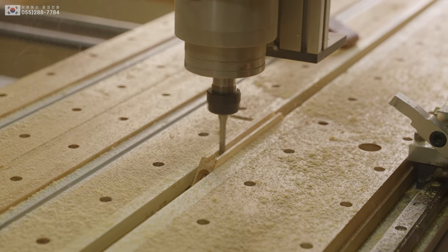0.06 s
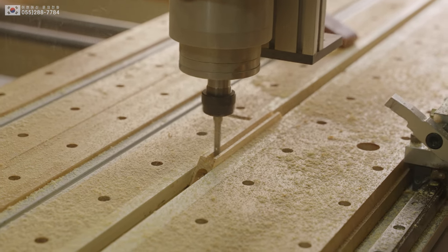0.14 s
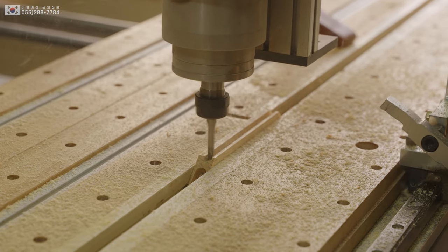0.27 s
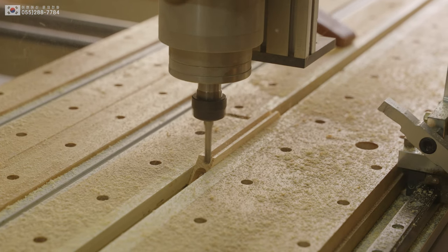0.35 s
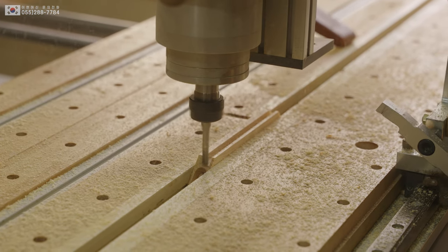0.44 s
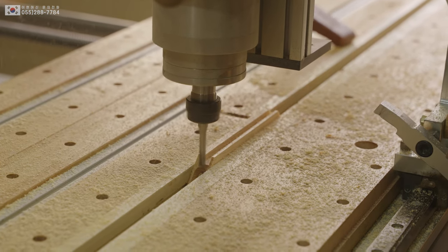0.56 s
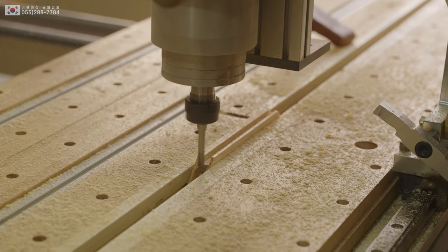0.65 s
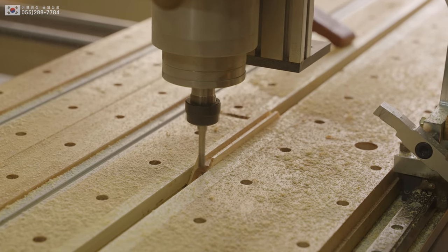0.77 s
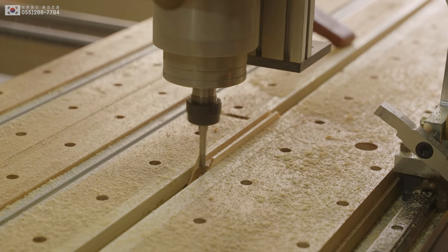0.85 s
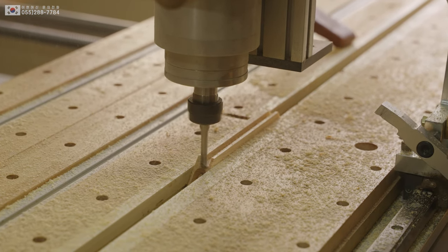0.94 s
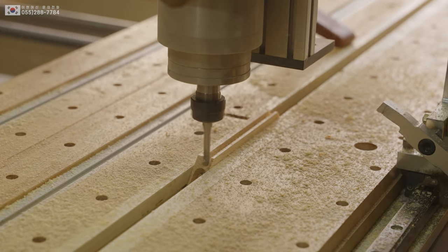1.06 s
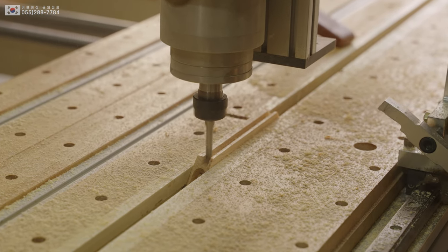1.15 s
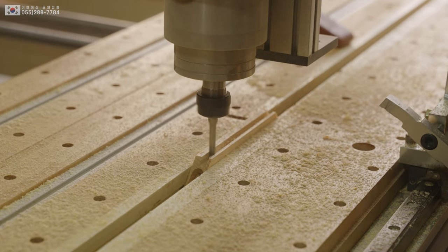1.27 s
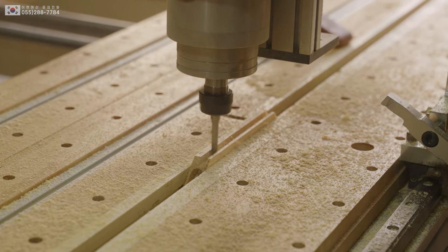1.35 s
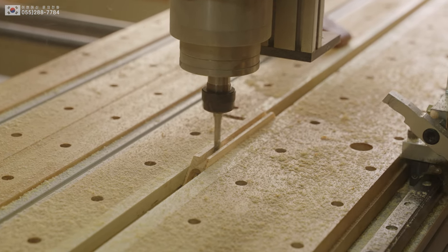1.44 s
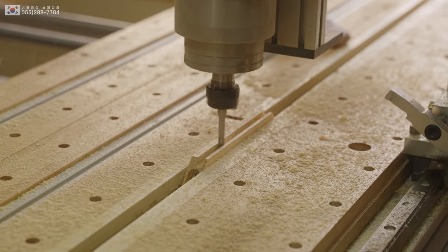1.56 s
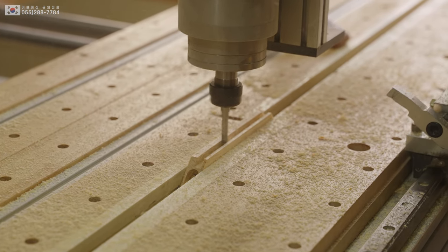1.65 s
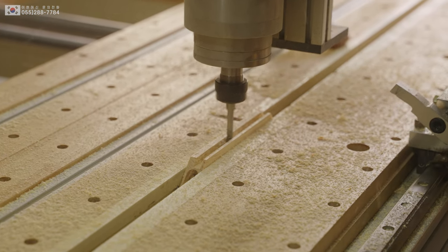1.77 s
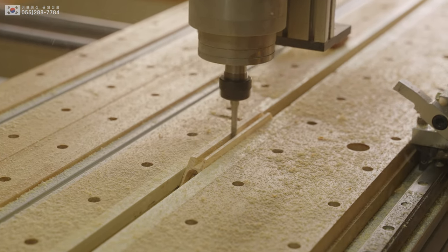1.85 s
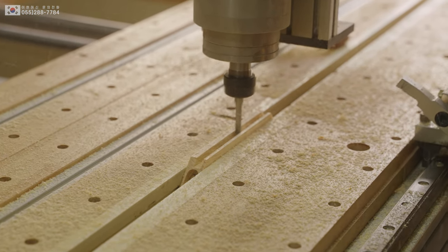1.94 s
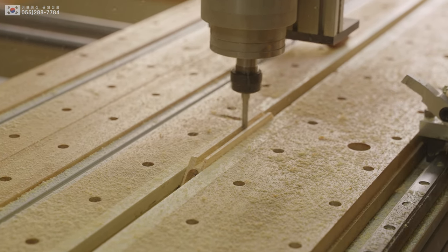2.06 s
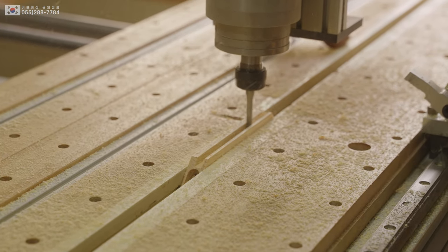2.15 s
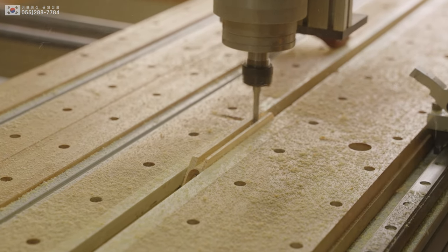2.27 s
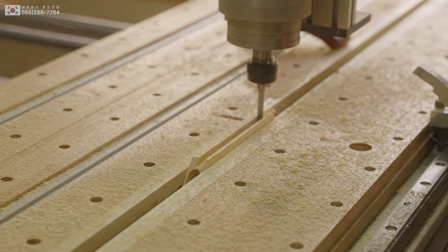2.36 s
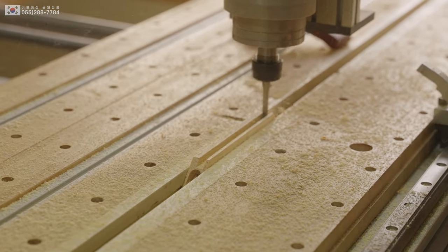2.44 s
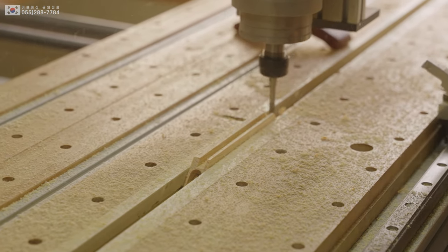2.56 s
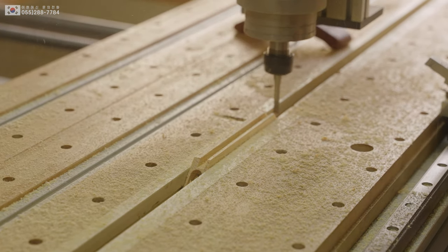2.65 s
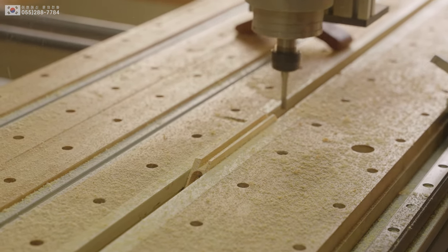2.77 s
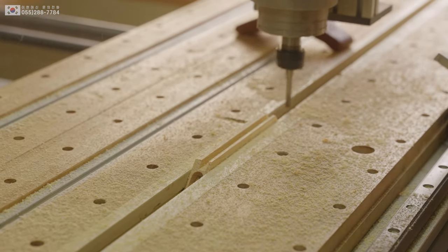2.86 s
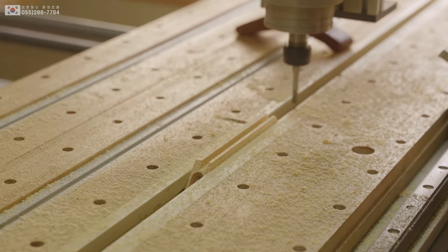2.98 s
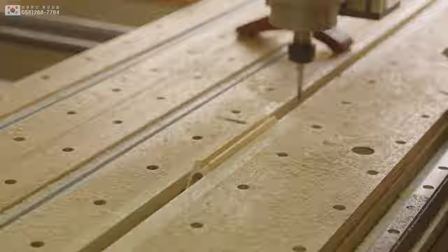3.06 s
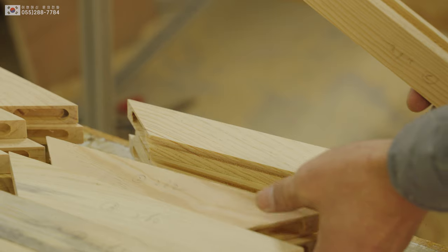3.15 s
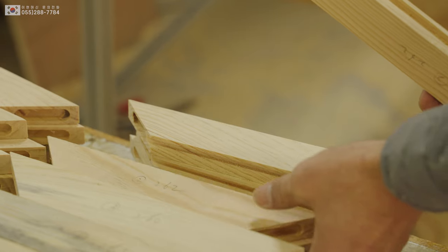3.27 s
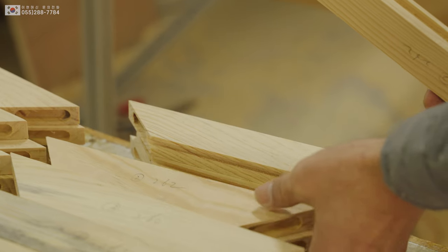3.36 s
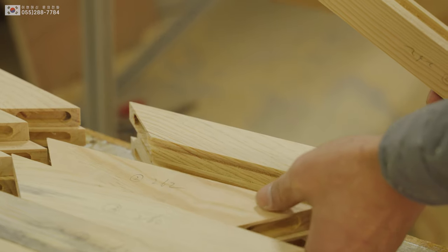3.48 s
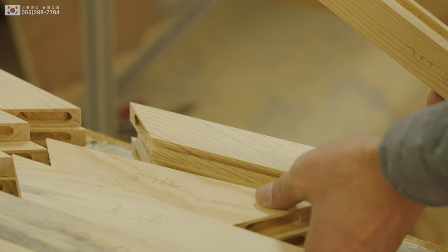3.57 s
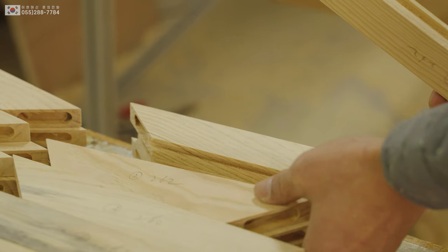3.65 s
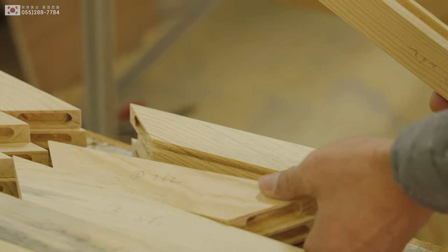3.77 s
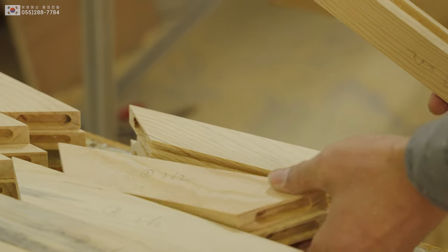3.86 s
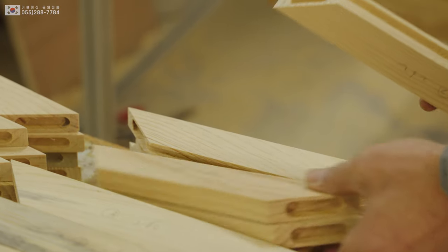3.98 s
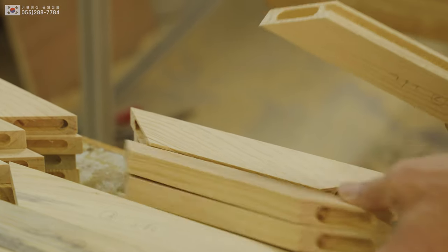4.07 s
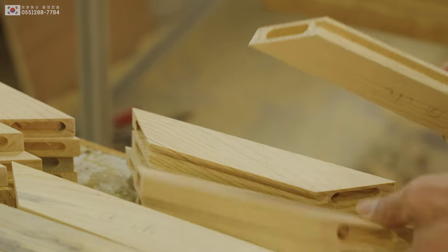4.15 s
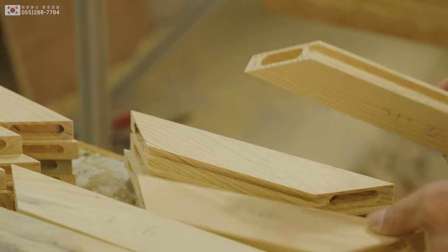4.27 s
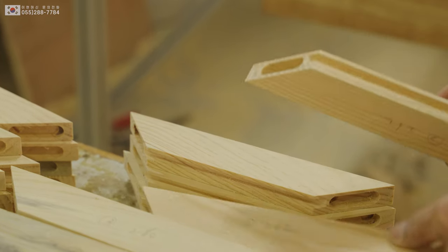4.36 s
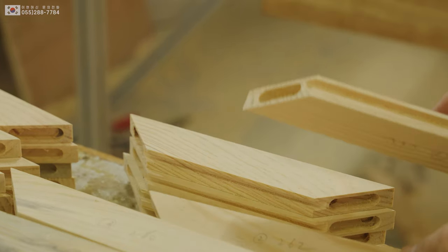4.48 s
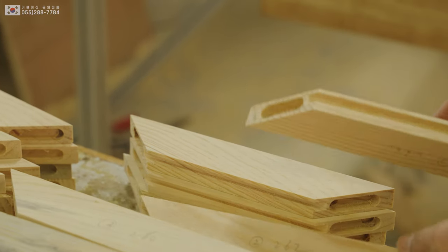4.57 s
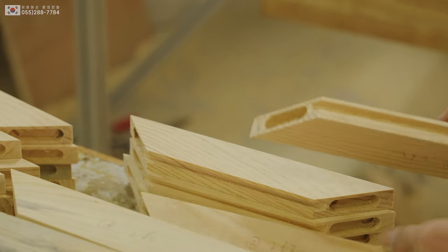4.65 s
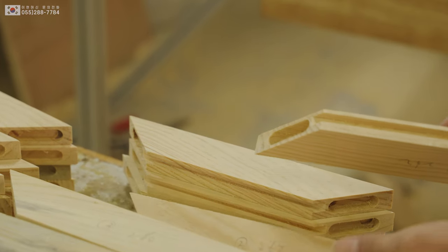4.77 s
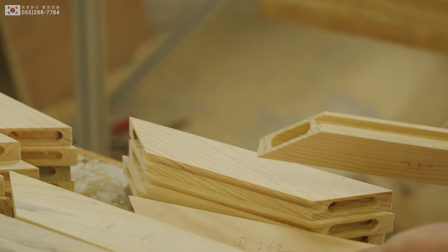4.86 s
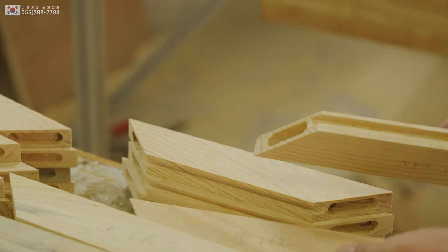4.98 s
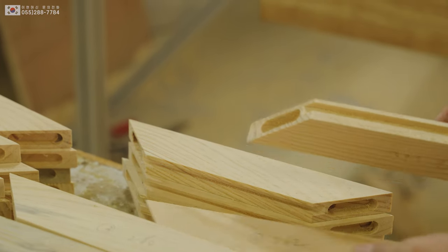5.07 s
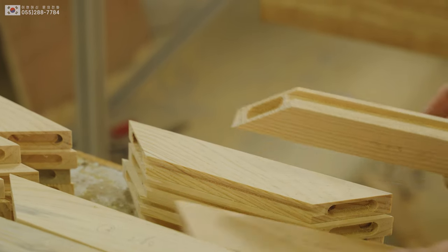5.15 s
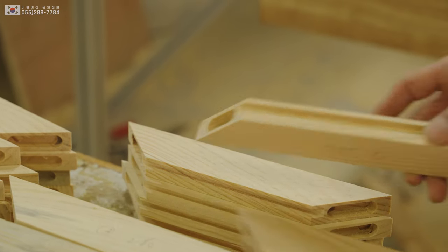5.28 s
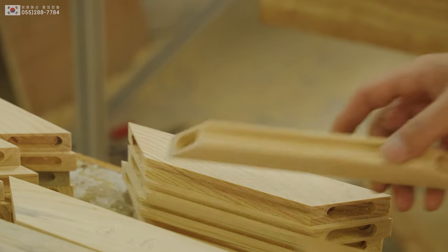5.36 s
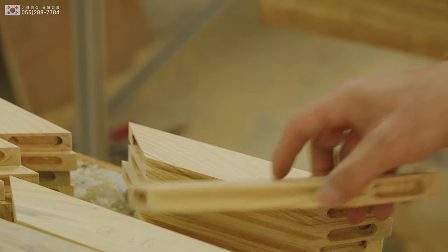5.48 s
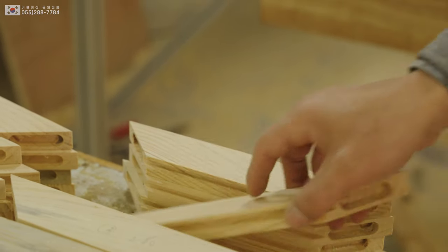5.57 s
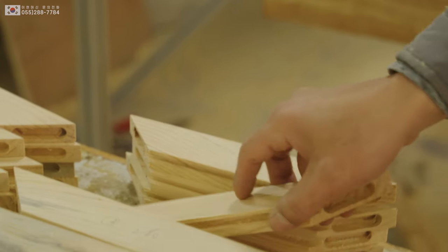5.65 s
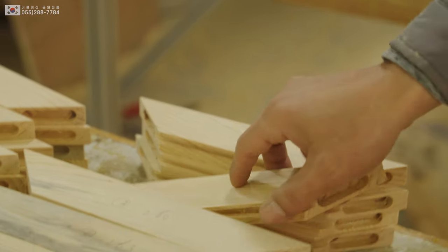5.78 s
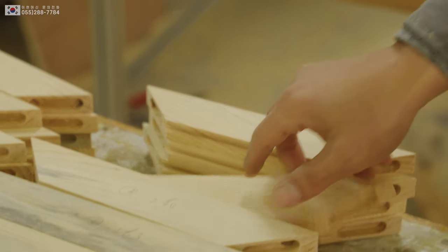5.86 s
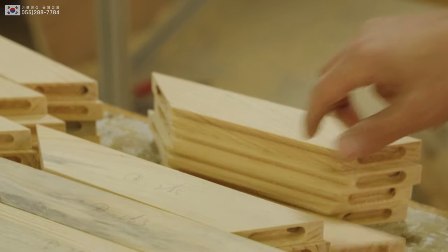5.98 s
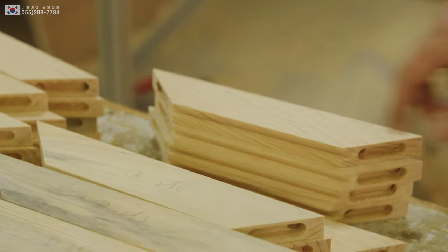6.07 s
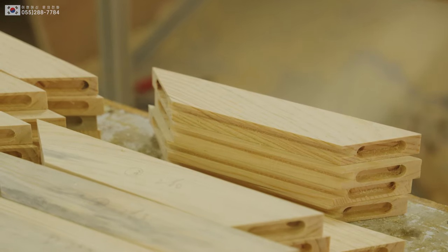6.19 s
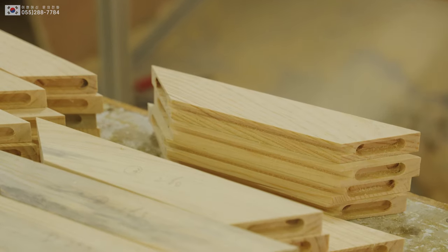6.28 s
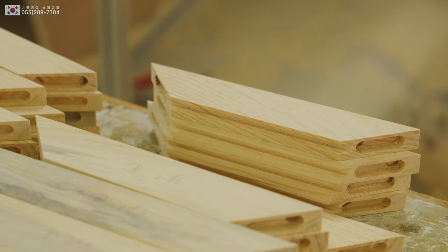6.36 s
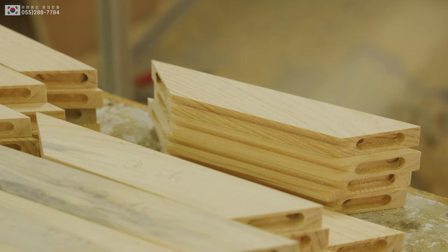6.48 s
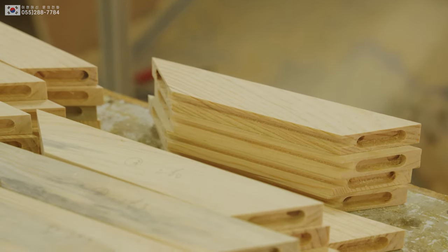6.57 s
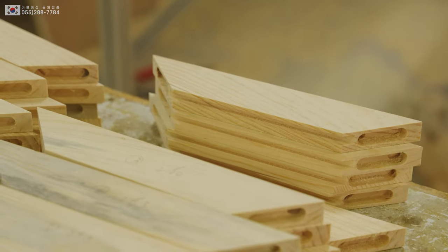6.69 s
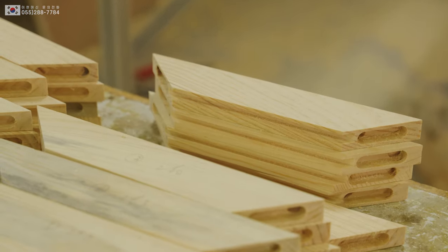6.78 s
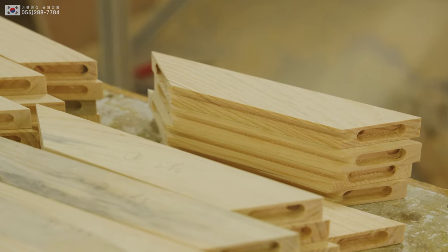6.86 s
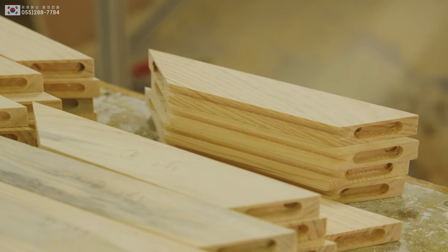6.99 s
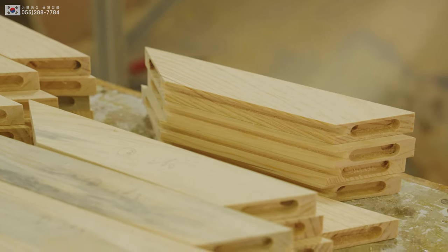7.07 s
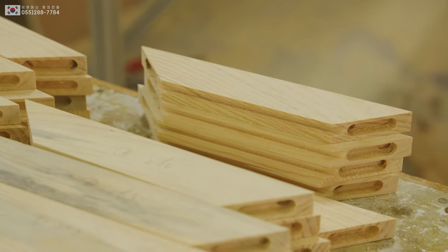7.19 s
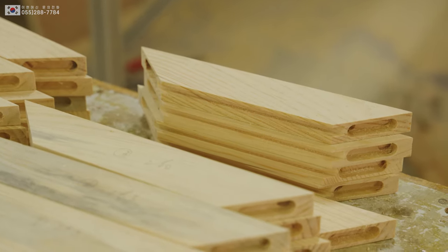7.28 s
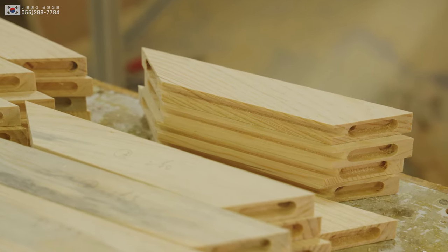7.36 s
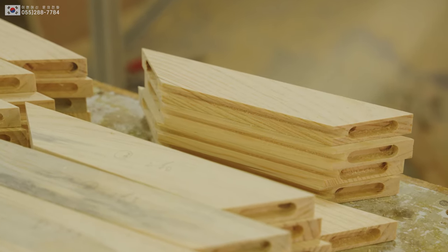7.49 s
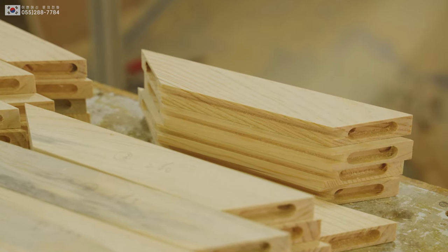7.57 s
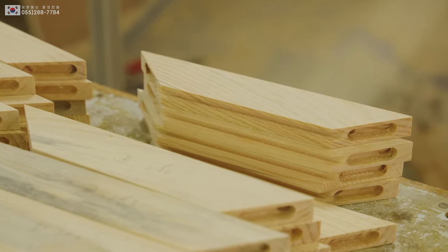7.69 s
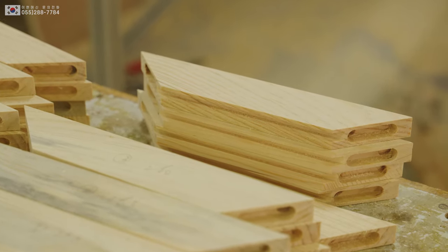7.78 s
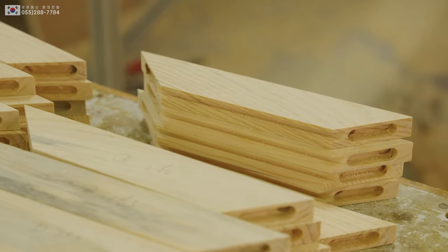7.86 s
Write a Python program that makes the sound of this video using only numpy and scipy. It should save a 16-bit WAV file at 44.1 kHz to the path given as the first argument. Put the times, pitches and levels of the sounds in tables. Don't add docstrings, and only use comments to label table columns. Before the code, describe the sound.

Shrill, hissing wood routing in a noisy workshop cuts abruptly to droning machines, with a sharp clattering slap of stacked boards.

```python
import sys
import numpy as np
from scipy import signal
from scipy.fft import rfft, irfft, next_fast_len
from scipy.io import wavfile
from scipy.ndimage import uniform_filter1d, map_coordinates

SR = 44100
rng = np.random.default_rng(int(sys.argv[2]) if len(sys.argv) > 2 else 0)


def dump_mix(stems):
    frames = np.atleast_2d(stems).T
    limited = np.clip(frames, -1, 1)
    pcm = np.round(limited * 32767).astype(np.int16)
    wavfile.write(sys.argv[1], SR, pcm)


def decibels_to_gain(level_db):
    exponent = np.asarray(level_db, float) / 20
    return 10 ** exponent


N = 349713
SPLICE = 3.164


def unit(x):
    return x / np.sqrt(np.mean(np.abs(x) ** 2) + 1e-20)


def along(points, hz):
    f, v = np.transpose(points)
    return np.interp(np.log(hz + 1), np.log(f + 1), v)


def wobble(n, rate):
    knots = rng.standard_normal(int(n * rate / SR) + 4)
    coarse = map_coordinates(knots, [np.arange(0, n + 64, 64) * rate / SR])
    return np.interp(np.arange(n), np.arange(len(coarse)) * 64, coarse)


def turning(hz):
    return 2 * np.pi * np.cumsum(hz) / SR


def swell(t, rows, order=None):
    total_db = 0
    for row in rows:
        if order is None or round(row[1]) == order:
            total_db = total_db + row[-2] * np.exp(-((t - row[0]) / row[-1]) ** 2 / 2)
    return total_db


def flare(t, rows, at, floor_db):
    gain = decibels_to_gain(floor_db)
    for s, which, db, half in rows:
        if abs(which - at) <= at / 500:
            gain = gain + decibels_to_gain(db - 1) * np.exp(-((t - s) / half) ** 2 / 2)
    return 20 * np.log10(gain)


def takes():
    cut = round(SPLICE * SR)
    return [(slice(a, b), np.arange(a, b) / SR) for a, b in ((0, cut), (cut, N))]


def tone(phase, db, fade_db, side_db, rate=7, rough=0, lean_db=0):
    n = len(phase)
    phase = phase + rng.uniform(0, 2 * np.pi)
    if rough:
        phase = phase + rough * wobble(n, 260)
    sine = np.sin(phase)
    mid = decibels_to_gain(db + fade_db * wobble(n, rate)) * sine
    side = decibels_to_gain(db + side_db - 2.5) * (wobble(n, rate) * sine + wobble(n, rate) * np.cos(phase))
    side += np.tanh(lean_db * np.log(10) / 40) * mid
    return np.sqrt(2) * np.array([mid + side, mid - side])


def rush(n, spectrum, take, patchy_db):
    # (frequency [Hz], correlation [0-1])
    likeness = [(60, 0.85), (300, 1), (600, 0.86), (1200, 1), (2500, 0.11), (5000, 0.59), (10000, 0.18),
                (15000, 0.13)]
    lead_s = -.00004, .00009
    # (frequency [Hz], level [dB])
    lean = [(60, 2.5), (250, 0.5), (600, 2), (1500, 3), (5000, 1.5), (14000, 0.6)]
    z = signal.stft(rng.standard_normal((2, n + 512)), nperseg=512)[2]
    field = uniform_filter1d(rng.standard_normal(z.shape[1:]), 7, 0)
    field = uniform_filter1d(field, 12, 1)
    pair = signal.istft(z * decibels_to_gain(patchy_db * unit(field)), nperseg=512)[1]
    m = next_fast_len(n + 8192)
    hz = np.fft.rfftfreq(m, 1 / SR)
    turn = np.arccos(np.clip(along(likeness, hz), 0, 1)) / 2
    a, b = rfft(pair, m) * decibels_to_gain(along(spectrum, hz)) * [np.cos(turn), np.sin(turn)]
    tilt = decibels_to_gain(along(lean, hz) / 2) * np.exp(1j * np.pi * hz * lead_s[take])
    return unit(irfft(np.array([(a + b) * tilt, (a - b) / tilt]), m)[:, :n])


def hall():
    # (frequency [Hz], level [dB per Hz])
    roar_spectra = [
        [(25, -47), (150, -39.5), (300, -29.5), (440, -17.5), (580, -18.5), (720, -7.5), (1000, -6.5), (1900, -2.5), (3000, -2), (4100, -5), (4800, -8.5), (9000, -11), (11400, -10), (15700, -13)],
        [(25, -40), (150, -41.5), (300, -31), (460, -23.5), (600, -21), (750, -11.5), (1100, -8.5), (1900, -6.5), (4000, -7), (4700, -11.5), (8500, -12.5), (11200, -14.5), (12500, -17), (15700, -18)],
    ]
    hums = [(298, -66, -75), (501.8, -46, -48), (596, -68, -66), (642, -57, -60), (712, -54, -56),
            (1042, -70, -57), (1507, -45, -56), (10870, -54, -50.5), (11047, -48, -58), (11152, -42.5, -59)]
    # (time [s], hum [Hz], level [dB], half length [s])
    hum_swells = [(.8, 502, 2, .2), (2.1, 502, -2.5, .8), (4.2, 502, 2, 1.1), (7.5, 502, -3, .8),
                  (.4, 596, 11, .5), (.7, 642, 4, .25), (5.4, 502, 2.5, .5), (7.5, 298, 8, .6),
                  (4.6, 1042, 10, .45), (.15, 1507, 4, .08), (.35, 1507, 8, .04), (1.18, 1507, 9, .05),
                  (1.85, 1507, 3, .1), (2.38, 1507, 10, .05), (.9, 11152, 3, .35), (2.85, 502, -3, .25),
                  (.8, 298, 3, .2)]
    roar_db, roar_falls_db_per_s = (-41.5, -40.5), 0.33
    drive_falls_db_per_s = 4
    parts = []
    for take, (span, _) in enumerate(takes()):
        n = span.stop - span.start
        t = np.arange(n) / SR
        level_db = roar_db[take] - take * roar_falls_db_per_s * t + 16.5 + 0.056 * wobble(n, 4.03)
        part = decibels_to_gain(level_db) * rush(n, roar_spectra[take], take, patchy_db=0.52)
        for hz, *level in hums:
            fall_db = drive_falls_db_per_s * np.clip(t - 1.6, 0, None) * (hz > 10000 and take == 0)
            swell_db = swell(t + take * SPLICE, hum_swells, order=round(hz))
            phase = 2 * np.pi * hz * t + 0.15 * wobble(n, 2.77)
            low = hz < 600
            part += tone(phase, level[take] - fall_db + swell_db, fade_db=1.2 if low else 3,
                         side_db=-14 if low else -2, rate=3.07)
        parts.append(part)
    return np.hstack(parts)


def fan():
    # (time [s], whine [Hz])
    fan_speed = [(0, 1137.5), (.5, 1138), (.97, 1123.8), (1.22, 1102.3), (1.46, 1092.6), (1.95, 1050.9),
                 (2.43, 1006.6), (2.8, 981.5), (3.164, 966.9)], [(3.164, 1091.2), (3.72, 1106.4),
                 (4.01, 1105.2), (4.57, 1102.4), (5.69, 1090.5), (5.97, 1090.4), (6.53, 1109.2),
                 (7.09, 1113.3), (7.93, 1114.5)]
    fan_orders = (.5, 1, 2, 4, 8, 12), (.5, 1, 4, 8, 12, 11)
    fan_levels = (-62, -43, -45, -47, -43.5, -55), (-56, -47, -51, -37.5, -46.5, -56)
    # (time [s], multiple, level [dB], half length [s])
    fan_swells = [(1, .5, 6, .2), (2.2, .5, 9, .2), (3.85, .5, -7, .1), (4.25, .5, 3, .2),
                  (4.7, .5, -6, .07), (5.55, .5, 7.5, .4), (6.35, .5, -8, .15), (6.75, .5, 3, .15),
                  (7.3, .5, -5, .15), (.95, 1, 8, .25), (1.95, 1, 13, .12), (2.85, 1, 6, .25),
                  (0, 4, -6, .1), (1.58, 1, 5, .08), (1.98, 2, 7, .08), (1.58, 2, 7, .08), (.75, 4, 8, .25),
                  (.17, 8, 4, .07), (.65, 8, 7, .3), (1.6, 8, 3, .3), (1.98, 8, 7, .08), (2.5, 8, 4, .1),
                  (2.95, 8, -3, .2), (.7, 12, 9, .3), (3.2, 8, 5, .1), (3.87, 8, -7, .04),
                  (4.07, 8, 5, .07), (4.75, 8, -4, .04), (5.08, 8, 7, .09), (5.77, 8, 6, .15),
                  (6.2, 8, 6, .08), (6.78, 8, 9, .1), (7.2, 8, -8, .03), (7.53, 8, -6, .03),
                  (7.7, 8, 4, .07), (7.4, 8, 3, .06), (5.38, 1, 8, .1), (4.64, 4, 11, .11),
                  (3.9, 4, 7, .12), (7.3, 4, 7, .25), (6.25, 4, -5, .2), (5.4, 8, -7, .015),
                  (6.5, 8, -6, .015), (6.36, 12, 6, .08), (4.22, 8, -9, .01), (4.33, 8, -7, .01),
                  (3.28, 12, 4, .1), (4.55, 12, -8, .05), (5.2, 12, 4, .12), (5.95, 12, -5, .12),
                  (5.2, 11, 6, .5)]
    out = np.zeros((2, N))
    for (span, t), speed, levels, orders in zip(takes(), fan_speed, fan_levels, fan_orders):
        hz = np.interp(t, *np.transpose(speed))
        steady_hz = uniform_filter1d(hz, SR // 4, mode="nearest")
        blades = turning(steady_hz * (1 + .0006 * wobble(len(hz), 40)))
        for k, db in zip(orders, levels):
            level_db = db + swell(t, fan_swells, order=round(k))
            out[:, span] += tone(k * blades, level_db, fade_db=2.4, side_db=-3.5,
                                 rate=24 if k > 2 else 6, rough=.012 * k)
    return out


def planer():
    # (from [s], to [s])
    boards_fed = [(0, 1.1), (SPLICE, 6.49)]
    knife_idle = (-50, -44, -69, -62), (-47.5, -44, -47.5, -48.5)
    knife_loaded = (-38, -30, -35.5, -43), (-39, -39, -40.5, -50)
    # (time [s], knife multiple, level [dB], half length [s])
    knife_swells = [(3.75, 1, 4, .1), (1.25, 2, 5, .12), (2.1, 2, 5, .25), (2.93, 2, 5, .08),
                    (.45, 3, 6, .2), (5.6, 1, 3.5, .5), (6.2, 1, 3, .15), (4.25, 2, 4.5, .25),
                    (5, 2, -8, .2), (6.55, 2, -7, .12), (7.5, 2, 4, .3), (4.45, 1, -2.5, .2),
                    (5.58, 2, 8.5, .15), (6.9, 2, 5, .15), (3.25, 3, 3, .1), (5.8, 3, 3, .08),
                    (5.63, 3, -5, .07), (5.13, 3, 6, .18), (6.52, 3, 3, .04), (6.28, 3, -5, .15),
                    (4.72, 4, 7, .1), (5.15, 4, 6, .12), (5.5, 4, 14, .22)]
    # (shaft multiple, level against the knives [dB])
    shaft_orders = [(4, -10), (5, -11), (7, -8), (10, -10), (11, -10), (15, -7), (18, -14), (21, -16),
                    (24, -14), (27, -15), (33, -12), (36, -11), (39, -15), (42, -12), (48, -16), (51, -17)]
    shaft_levels = 2.5, -2
    # (time [s], shaft multiple, level [dB], half length [s])
    shaft_swells = [(.55, 4, 4, .5), (5, 4, -4, 1.2), (.75, 51, 3, .2), (4.7, 11, 6, .1),
                    (5.55, 11, 4, .07), (5.95, 11, 4, .06), (5.15, 11, -4, .15), (5.9, 10, -4, .3),
                    (4.5, 36, 6, .2), (4.8, 33, 4, .3), (5, 42, -7, 1.5), (5.3, 15, -6, .15)]
    knife_hz, knife_sag_hz = 895.6, 3.2
    out = np.zeros((2, N))
    settings = zip(takes(), boards_fed, knife_idle, knife_loaded, shaft_levels)
    for (span, t), (start, end), idle, loaded, shaft_db in settings:
        load = uniform_filter1d(1. * (t >= start) * (t < end), SR // 10, mode="nearest")
        knives = turning(knife_hz - knife_sag_hz * uniform_filter1d(load, SR // 4))
        knife_db = []
        for k, (a, b) in enumerate(zip(idle, loaded), 1):
            knife_db.append(a + (b - a) * load + swell(t, knife_swells, order=k))
        out[:, span] += tone(knives, knife_db[0], fade_db=2.0, side_db=-26, lean_db=6.0, rate=7.18)
        for k, db in enumerate(knife_db[1:], 2):
            out[:, span] += tone(k * knives, db, fade_db=1.5, side_db=-10.5, rate=8.01)
        for order, db in shaft_orders:
            level_db = knife_db[0] + db + shaft_db + swell(t, shaft_swells, order=order)
            out[:, span] += tone(order * knives / 3, level_db, fade_db=3, side_db=.4, rate=4)
    return out


def boards():
    # (time [s], peak [dB], brightness [dB], click [dB])
    knocks = [
        (3.207, -27, -11, -4.5),
        (4.254, -35, -10, -3),
        (5.945, -23, -1, -3),
        (5.988, -13, 0.5, -5),
        (6.011, -21, 5, -3),
        (6.077, -21.5, 1, 11),
        (6.086, -21, 2, -6),
    ]
    # (frequency [Hz], level [dB], t60 [s])
    board_modes = [(196, -10, 0.038), (282, -2, 0.038), (370, 0, 0.051), (776, 7.5, 0.083),
                   (897, 17, 0.031)]
    # (time [s], level [dB], frequency [Hz], t60 [s])
    edge_taps = [
        (5.946, -20, 1010, .012),
        (5.993, -13.5, 3360, .019),
        (6.078, -10, 1900, 0.0089),
        (6.086, -3, 2600, 0.0039),
        (7.537, -16, 3270, .019),
        (7.55, -18, 3300, .019),
    ]
    # (time [s], peak [dB])
    bumps = [(0.776, -50), (0.829, -48), (0.859, -50), (0.949, -51), (3.499, -52), (3.678, -45),
             (3.739, -45), (3.769, -48), (3.839, -52)]
    out, t = np.zeros(N + SR), np.arange(SR // 6) / SR
    click = decibels_to_gain(-60 * t / 0.019) * np.sin(2 * np.pi * 3300 * t) * (1 - np.exp(-t / .0006))
    for s, db, bright_db, click_db in knocks:
        ring = 0
        for hz, level, t60 in board_modes:
            mode_db = level - 1.23 * bright_db * (hz < 600) + rng.normal(0, 2.1)
            ring = ring + decibels_to_gain(mode_db - 60 * t / t60) * np.sin(2 * np.pi * hz * rng.normal(1, 0.03) * t)
        knock = ring * (1 - np.exp(-t / .0014)) ** 2 + decibels_to_gain(click_db + 3) * click
        out[round(s * SR):][:len(t)] += decibels_to_gain(db - 13) * knock
    for s, db, hz, t60 in edge_taps:
        tap = np.sin(2 * np.pi * hz * t) * (1 - np.exp(-t * hz / 2))
        out[round(s * SR):][:len(t)] += decibels_to_gain(db - 60 * t / t60) * tap
    no_bass = signal.butter(4, 230, "high", fs=SR, output="sos")
    out = signal.sosfilt(no_bass, out)
    for s, db in bumps:
        thud = sum(np.sin(2 * np.pi * hz * t) for hz in rng.uniform([60, 120, 200], [110, 190, 330]))
        out[round(s * SR):][:len(t)] += decibels_to_gain(db - 4.5 - 60 * t / 0.13) * thud * (1 - np.exp(-t / 0.0039))
    out[round(SPLICE * SR):][:8] += decibels_to_gain(-26)
    return out[:N] * decibels_to_gain([[1.2], [-1.2]])


def rasps():
    # (time [s], frequency [Hz], level [dB], half length [s])
    rough_rings = [(.21, 7920, -35, .05), (.98, 10770, -38, .06), (1.04, 12060, -34, .025),
                   (1.09, 11110, -30, .04), (1.2, 11890, -37, .04), (1.52, 9900, -34, .05),
                   (1.72, 11630, -34, .05), (1.82, 10940, -33, .04), (2.012, 9820, -32, .04),
                   (2.064, 6030, -36, 0.059), (2.16, 11370, -34, .04), (2.202, 6030, -36, .03),
                   (2.25, 7920, -38, .04), (2.36, 8100, -37, .025), (2.47, 7840, -38, .025),
                   (2.56, 14810, -35, .035), (2.57, 10900, -31, .035)]
    out = np.zeros((2, N))
    for s, hz, db, half in rough_rings:
        span = slice(round((s - 3 * half) * SR), round((s + 3 * half) * SR))
        t = np.arange(span.start, span.stop) / SR
        ring = tone(2 * np.pi * hz * t, db, fade_db=2, side_db=-4, rate=90, rough=.9)
        out[:, span] += ring * np.exp(-((t - s) / half) ** 2 / 2)
    return out


def chatter(t):
    # (enters [s], leaves [s], pitch [Hz], level at entry [dB], at exit [dB])
    passes = [
        (-.05, .415, 2773, -21.3, -21.8),
        (1.034, 2.365, 2774, -22.3, -25.3),
        (2.44, 2.59, 2768, -22, -21.5),
    ]
    # (time [s], level [dB], half length [s])
    chatter_swells = [(0, 2.5, .03), (.26, 3, .035), (.32, -2, .02), (1.08, -1.5, .04), (1.2, 1.5, .05),
                      (1.34, 2, .05), (1.51, -3.5, .035), (1.63, -2, .03), (1.955, -10, .04), (2.04, 3, .012),
                      (2.065, -3, .007), (2.27, -2, .015), (2.315, -2, .012), (2.345, 4, .012), (2.12, 1.5, .05),
                      (2.57, 1.5, .05), (2.375, -3, .008), (2.412, 12, .014), (2.465, -5, .012), (2.53, -3, .01),
                      (2.59, -3, .01), (2.64, 11, .016)]
    enter_s, leave_s, sag_hz_per_s = .018, .16, 4.5
    hz, gain = np.zeros(len(t)), decibels_to_gain(-54)
    for enter, leave, pitch_hz, in_db, out_db in passes:
        hz[t >= enter] = (pitch_hz - sag_hz_per_s * (t - enter))[t >= enter]
        held_db = np.interp(t, [enter, leave], [in_db, out_db]) + swell(t, chatter_swells)
        held_db = held_db - 60 * np.clip(t - leave, 0, None) / leave_s
        gain = gain + decibels_to_gain(held_db) * np.clip((t - enter) / enter_s, 0, 1)
    return hz, 20 * np.log10(gain)


def router():
    # (time [s], level [dB])
    lift = [
        (2.615, 0),
        (2.645, -9),
        (2.75, -30),
    ]
    # (time [s], left over right [dB])
    travel = [(0, 4), (.28, -1), (.34, 7), (1.05, 8), (1.3, 3), (1.75, -8), (1.87, -30), (2.05, -8),
              (2.36, 10)]
    # (time [s], flute multiple or 0 for the sum tone, level [dB], half length [s])
    flute_swells = [(.04, 1, 9, .05), (.36, 1, 11, .05), (1.1, 1, 8, .12), (1.44, 1, 5, .05),
                    (1.9, 1, 3, .3), (2.46, 1, 4, .06), (.33, 2, 9, .06), (1.02, 2, 10, .03),
                    (2.15, 2, 6, .3), (2.45, 2, 6, .07), (.18, 3, 3, .08), (.31, 3, -5, .025),
                    (.39, 3, 6, .04), (1.24, 3, 4, .05), (1.1, 3, -5, .04), (1.84, 3, -7, .06),
                    (1.97, 3, 6, .02), (1.58, 3, 11, .07), (2.14, 3, 10, .14), (2.435, 3, 12, .02),
                    (2.48, 3, 9, .025), (2.61, 3, 8, .015), (2.64, 3, 9, .012), (2.55, 3, 13, .06),
                    (1.045, 0, -9, .01), (1.08, 0, 4, .04), (1.2, 0, 2, .04), (1.36, 0, 6, .07),
                    (2.47, 0, -2, .02), (1.92, 0, -4, .03), (.47, 0, -6, .03), (2.59, 0, -12, .05)]
    # (time [s], level [dB], half length [s])
    sideband_swells = [
        (1.22, 2, 0.27),
        (2.05, 2.5, 0.24),
    ]
    # (frequency [Hz], level [dB])
    sum_tones = [(1400, -16), (2300, -27), (3300, -23), (4300, -40), (5000, -23.5), (6500, -23.5),
                 (8000, -25), (9500, -25), (11200, -26), (13000, -24), (15300, -23)]
    # (time [s], frequency [Hz], level [dB], half length [s])
    standouts = [(1.25, 1767, -38, .1), (1.9, 1767, -40, .35), (.25, 2269, -39, .06),
                 (2.18, 3273, -39, .06), (1.72, 3273, -41, .1), (.35, 4016, -41, .05),
                 (1.68, 4016, -40, .06), (1.97, 4016, -34, .05), (1.8, 4277, -38, .07),
                 (1.1, 4779, -41, .08), (2.03, 6044, -39, .07), (2.03, 6285, -37, .1),
                 (.05, 6546, -37, .05), (.25, 6546, -41, .04), (1.32, 6546, -36, .08),
                 (2.12, 6546, -40, .07), (1.32, 6787, -35, .09), (1.25, 7550, -37, .13),
                 (.25, 7811, -38, .05), (1.38, 7811, -40, .04), (2.03, 7811, -41, .07),
                 (2.57, 7811, -39, .04), (.3, 8052, -41, .07), (2.28, 8052, -40, .05),
                 (1.26, 8313, -34, .11), (2.12, 8313, -39, .07), (.35, 8554, -41, .04),
                 (1.1, 8554, -40, .07), (1.3, 8815, -41, .12), (2.32, 10060, -41, .08),
                 (.25, 11084, -41, .05), (1.27, 11084, -36, .13), (1.68, 11084, -40, .04),
                 (2.57, 11084, -31, .04), (1.78, 11827, -41, .12)]
    # (time [s], multiple, level [dB], half length [s])
    squeals = [(.41, 8, -40, .025), (.41, 12, -43, .03), (1.04, 8, -40, .012), (1.04, 9, -37, .02),
               (1.04, 12, -39, .02), (1.04, 14, -43, .015), (1.04, 15, -39, .02), (2.46, 8, -39, .025),
               (2.46, 9, -43, .02), (2.57, 8, -41, .03), (2.57, 12, -42, .03), (2.57, 15, -36, .035)]
    # (frequency [Hz], level [dB])
    chip_low = [(500, -40), (900, -9.5), (2500, -2), (4000, -3), (6500, 0), (8200, 7), (9500, -17),
                (11000, -40)]
    # (frequency [Hz], level [dB])
    chip_high = [(7000, -44), (9000, 13), (10000, 8), (11200, 15), (12500, 10.5), (14000, 0), (15000, 14.5),
                 (15800, -8)]
    # (time [s], brighter by [dB], level [dB], half length [s])
    chip_puffs = [
        (1.045, 0, 6, .025),
        (1.35, -1, -3.5, 0.067),
        (1.703, -0.5, 3.5, .04),
        (1.99, -1.5, 5, 0.05),
        (2.184, -0.5, 2.5, 0.037),
        (2.46, -1.5, 4, 0.02),
        (2.575, 2, -0.5, 0.032),
    ]
    full_cut_db = -23
    flute_levels, flute_follows = (-40, -38, -38), .5
    out = np.zeros((2, N))
    span = slice(round(lift[-1][0] * SR))
    t = np.arange(span.stop) / SR
    hz, db = chatter(t)
    pan_db = np.interp(t, *np.transpose(travel))
    depth_db = db - full_cut_db
    effort_db = uniform_filter1d(db, SR // 16) + swell(t, sideband_swells)
    flute_hz = 1004.5 - .8 * t
    bite, shake = turning(flute_hz), turning(hz)

    for k, level_db in enumerate(flute_levels, 1):
        follow_db = flute_follows * np.minimum(depth_db, 0) + swell(t, flute_swells, order=k)
        out[:, span] += tone(k * bite, level_db + follow_db, fade_db=1.5, side_db=-10.5)
    out[:, span] += tone(shake, db, fade_db=.7, side_db=-6, rough=0.08, lean_db=pan_db)
    sum_db = full_cut_db - 6 + 0.46 * depth_db + swell(t, flute_swells, order=0)
    out[:, span] += tone(shake + bite, sum_db, fade_db=0.5, side_db=-7.0)

    for m in range(6):
        for k in range(-2, 11):
            at_hz = m * hz.mean() + k * flute_hz.mean() / 2
            already_heard = (m, k) in [(1, 0), (1, 2), (0, 4), (0, 6)]
            if 1700 < at_hz < 15600 and not already_heard:
                floor_db = effort_db + along(sum_tones, at_hz) - 3.5
                out[:, span] += tone(m * shake + k * bite / 2, flare(t, standouts, at_hz, floor_db),
                                     fade_db=2.5, side_db=-4, rate=12, rough=.2 * (at_hz > 5000))
    for k in sorted({row[1] for row in squeals}):
        out[:, span] += tone(k * bite, flare(t, squeals, k, -80), fade_db=2, side_db=-2, rate=30, rough=.3)

    # spectrum, level in full cut [dB], dB per dB of cut, sign of a puff's brightness
    for colour, level_db, follows, sign in ((chip_low, -29.5, 0.11, -1), (chip_high, -27, 0.082, 1)):
        puffs = [(s, puff_db + sign * tilt_db, half) for s, tilt_db, puff_db, half in chip_puffs]
        hiss_db = level_db + follows * depth_db + swell(t, puffs)
        out[:, span] += decibels_to_gain(hiss_db) * rush(len(t), colour, take=0, patchy_db=2.3)
    return out * decibels_to_gain(np.interp(np.arange(N) / SR, *np.transpose(lift)))


def scene():
    return hall() + fan() + planer() + boards() + rasps() + router()


def roll_off(x):
    return signal.sosfilt(signal.butter(12, 15735, fs=SR, output="sos"), x)


def record(dry):
    # (time [s], gain [dB])
    ducks = [
        (5.95, -2),
        (5.992, -4.5),
        (6.088, -6),
    ]
    t = np.arange(N) / SR
    duck_db = 0
    for s, db in ducks:
        duck_db = duck_db + db * np.clip((t - s) / .01, 0, 1) * np.exp(-np.clip(t - s, 0, None) / .075)
    m = next_fast_len(N + 8192)
    in_band = np.fft.rfftfreq(m, 1 / SR) < 15745
    kept = irfft(rfft(dry * decibels_to_gain(duck_db), m) * in_band, m)[:, :N]
    return roll_off(kept)


dry = scene()
out = record(dry)
dump_mix(out)
```